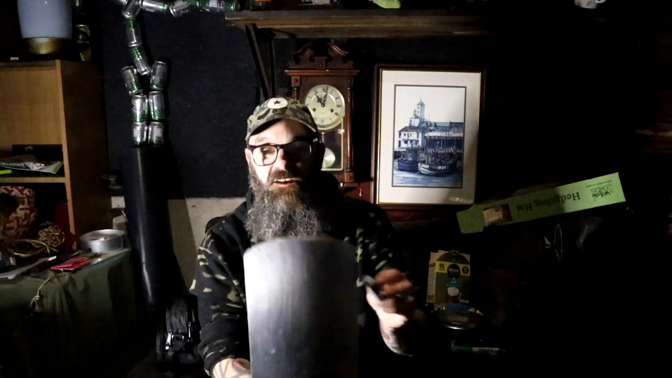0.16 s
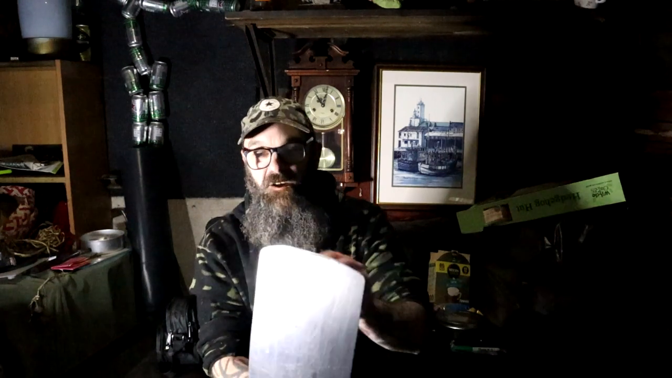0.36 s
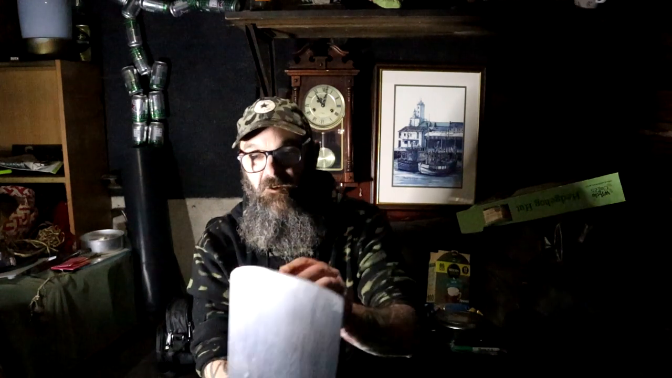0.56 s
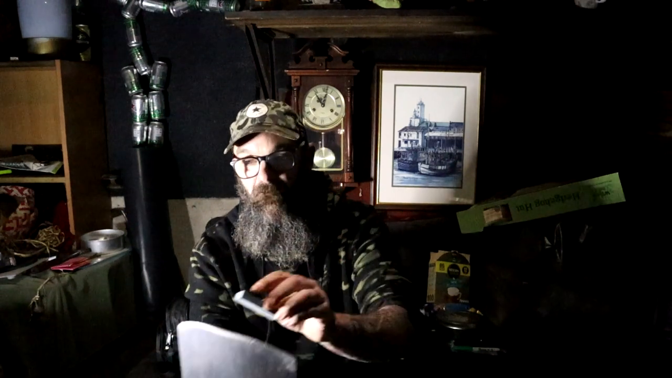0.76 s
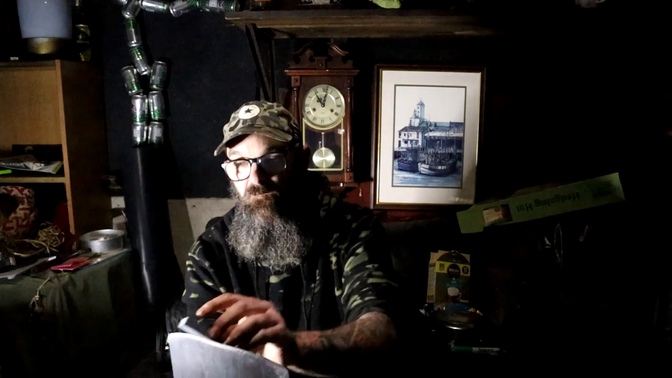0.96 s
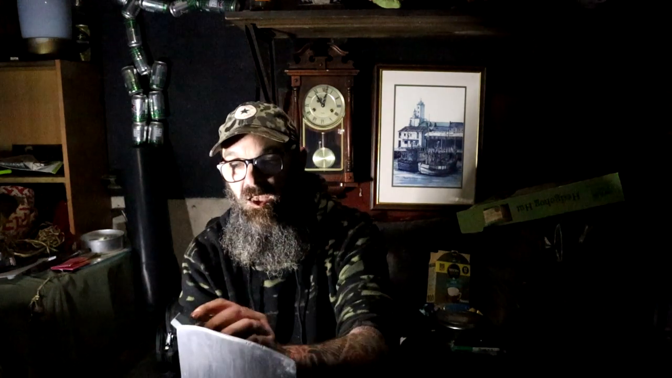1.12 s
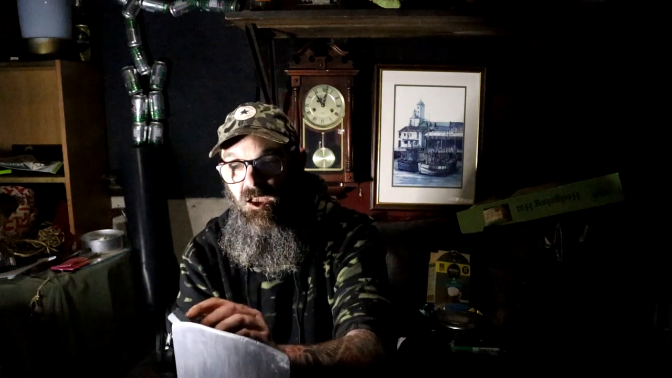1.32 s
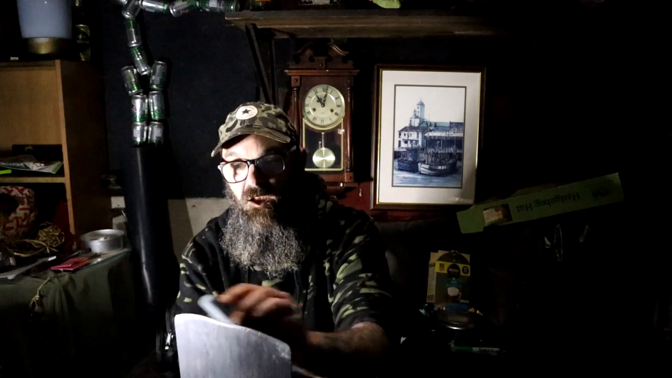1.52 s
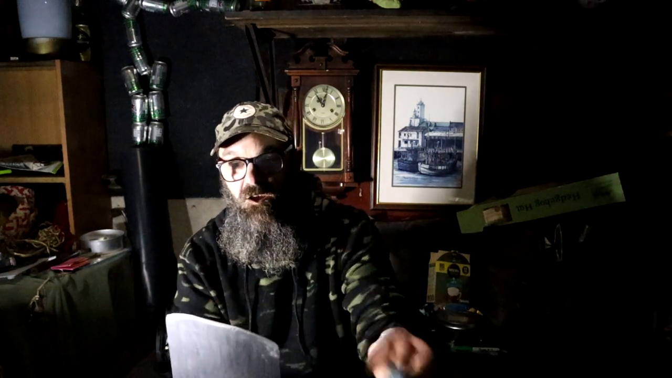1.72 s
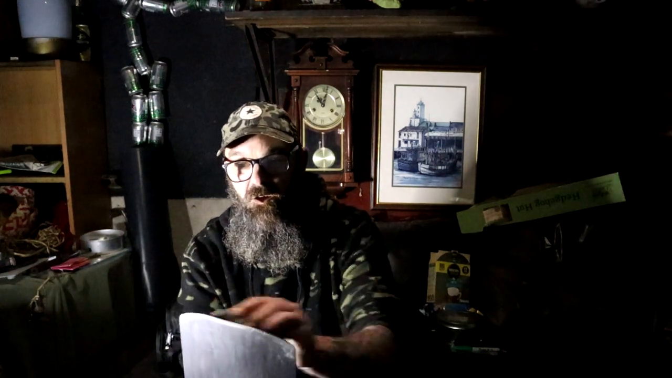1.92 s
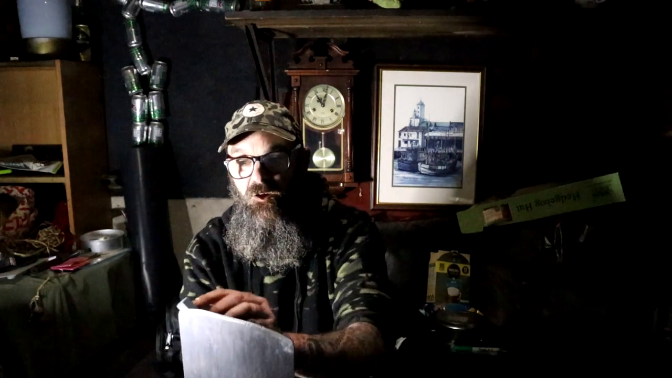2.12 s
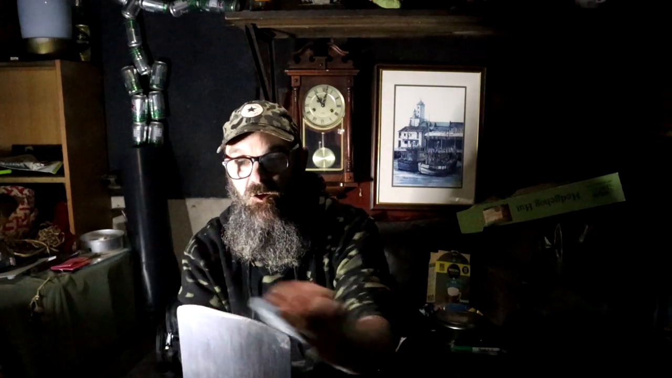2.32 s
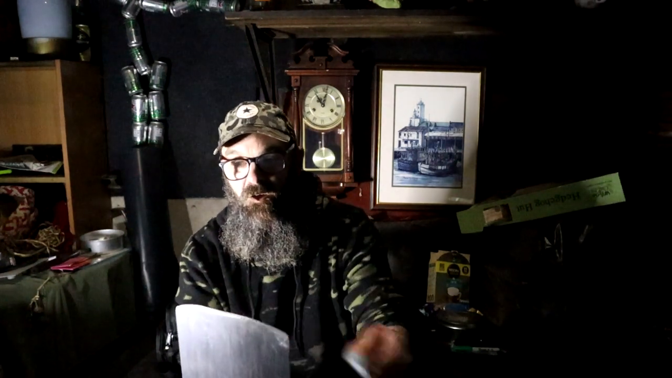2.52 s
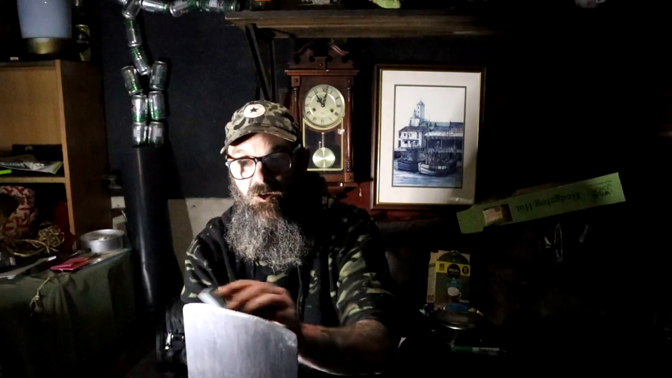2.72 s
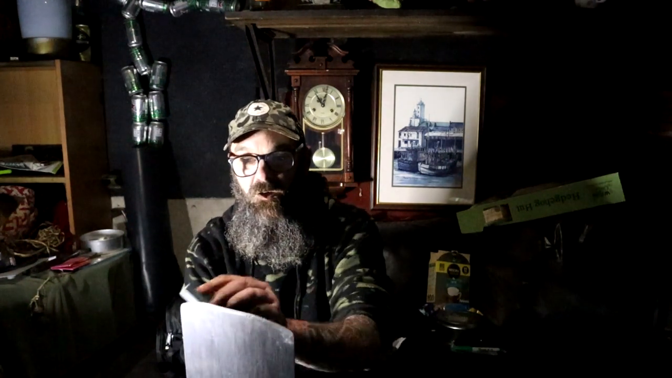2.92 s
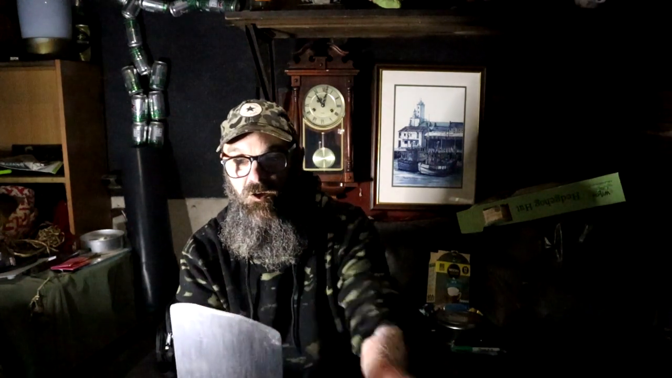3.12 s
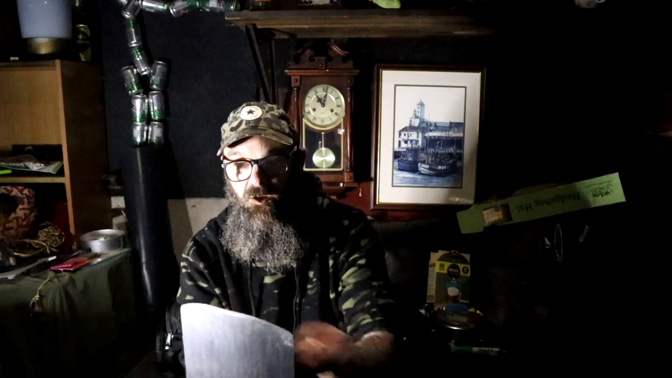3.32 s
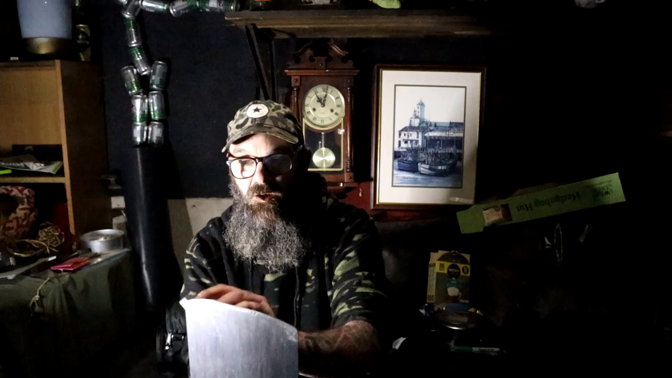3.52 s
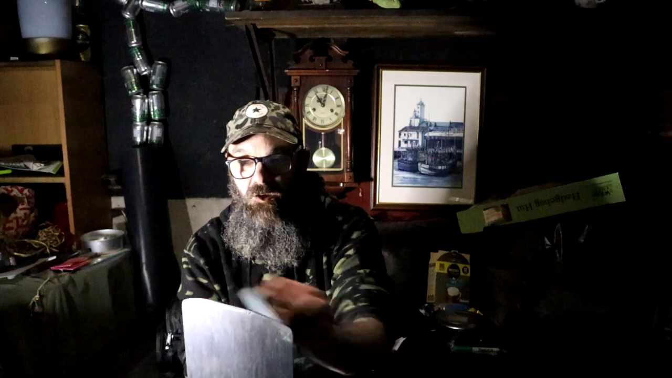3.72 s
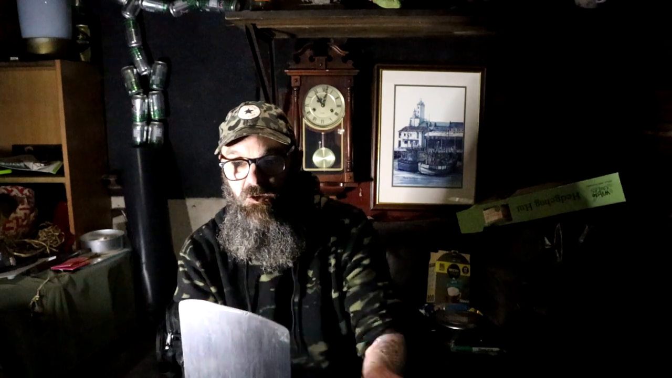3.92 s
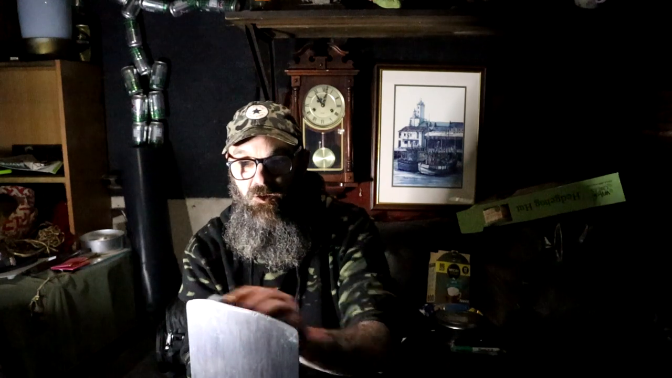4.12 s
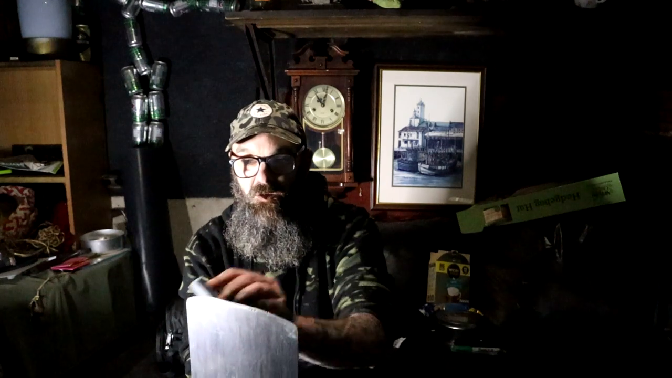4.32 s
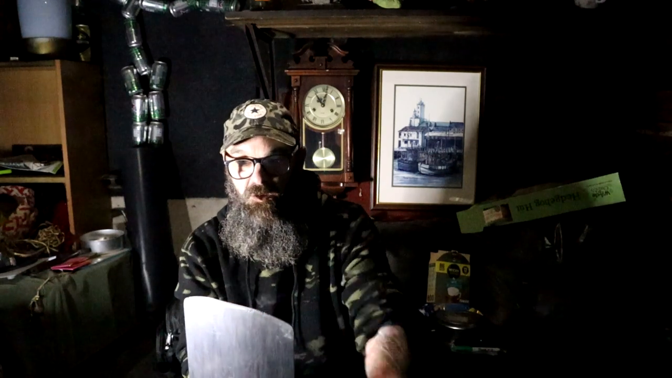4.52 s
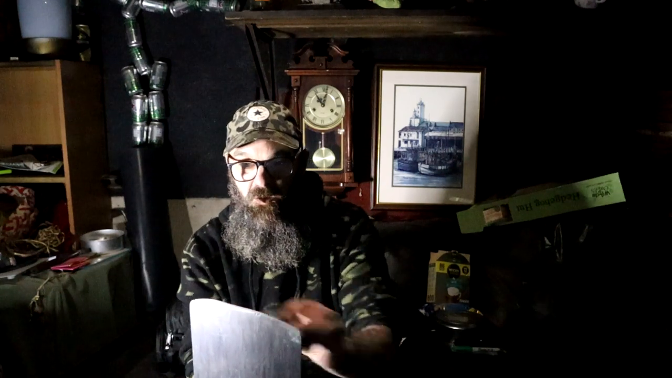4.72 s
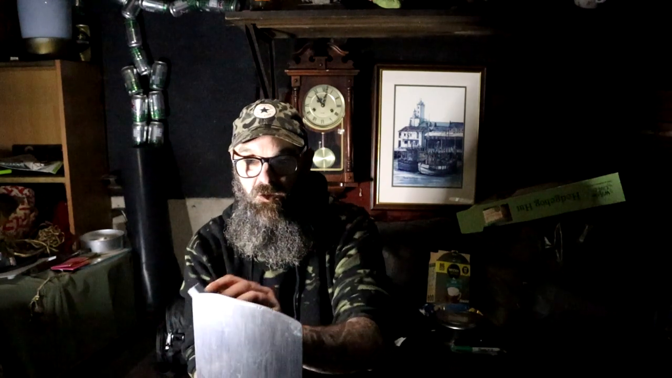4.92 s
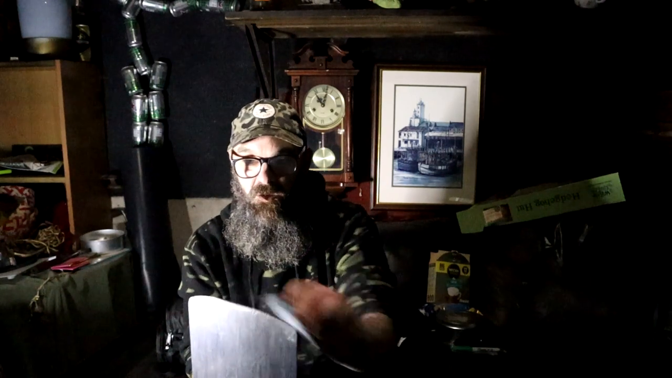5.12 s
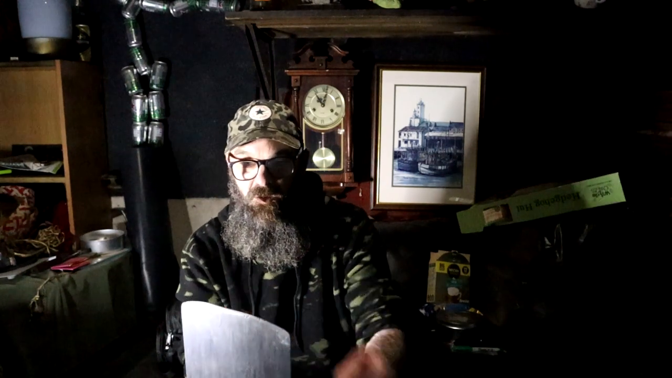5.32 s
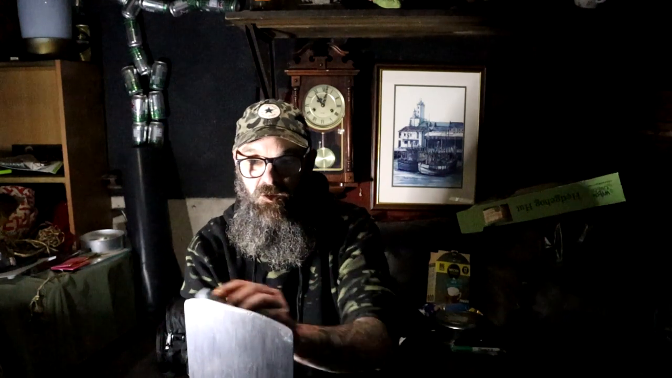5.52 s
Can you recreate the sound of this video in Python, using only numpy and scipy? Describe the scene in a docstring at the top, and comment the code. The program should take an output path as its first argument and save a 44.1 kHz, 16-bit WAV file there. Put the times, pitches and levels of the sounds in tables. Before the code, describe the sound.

In a small quiet shed, close to the microphone, sleeve and hand brush and bump a steel spade, zipping over the blade. A stone then taps and feels for the edge, followed by six gritty strokes roughly three quarters of a second apart. Each lands with a click, glides lightly, bites into a bright hard rasp and lifts off with a short metallic ring. The seat creaks faintly between strokes.

```python
"""In the faint air noise and hiss of a small shed, sleeve and hand first brush and bump a steel spade,
zip across its blade and slide off it. A sharpening stone then feels for the edge and is drawn along it
six times: each stroke lands with a tap, glides lightly, bites into a hard rasp and leaves the blade ringing.
Noise excites damped modes for stone and taps, decaying sines form the ring, and filtered slips make
the seat creak as the arm swings back."""
import sys
import numpy as np
from scipy import signal
from scipy.fft import rfft, irfft
from scipy.io import wavfile
from scipy.ndimage import uniform_filter1d, map_coordinates

SR = 44100
rng = np.random.default_rng(int(sys.argv[2]) if len(sys.argv) > 2 else 0)


def persist_wave(psi):
    """Save psi, clipped to +-1, as 16-bit WAV."""
    counts = np.round(np.clip(psi, -1, 1) * 32767).astype(np.int16)
    wavfile.write(sys.argv[1], SR, np.atleast_2d(counts).T)


N = 245017
TIME = np.arange(N) / SR


def undb(db):
    """Logarithmic level: decibels become an amplitude gain."""
    return 10 ** (np.asarray(db) / 20)


def unit(x):
    """Normalisation of power: scale to rms 1."""
    return x / np.sqrt(np.mean(x ** 2))


def noise():
    """White noise: equal mean power at every frequency."""
    return rng.standard_normal(N)


def walk(rate):
    """Slow random modulation: spread near 1, a new value rate times a second, straight lines between."""
    return 1.175 * np.interp(TIME * rate, np.arange(8000), rng.standard_normal(8000))


def colour(x, points):
    """Minimum-phase filtering: a causal response through the given (Hz, dB) points."""
    hz, db = np.transpose(points)
    size = 2048
    grid_hz = np.fft.rfftfreq(size, 1 / SR) + 1
    log_gain = np.log(undb(np.interp(np.log(grid_hz), np.log(hz), db)))
    # folding the cepstrum onto positive time makes the response causal
    cepstrum = irfft(log_gain)
    cepstrum[1:size // 2] *= 2
    cepstrum[size // 2 + 1:] = 0
    response = irfft(np.exp(rfft(cepstrum)))
    return signal.fftconvolve(x, response)[:N]


def resonate(x, hz, width):
    """Damped resonance: gain 1 at the centre, width in Hz."""
    return signal.lfilter(*signal.iirpeak(hz, hz / width, fs=SR), x)


def band(x, hz, kind):
    """Zero-phase filtering: low, high or band-pass without delay."""
    return signal.sosfiltfilt(signal.butter(4, hz, kind, fs=SR, output="sos"), x)


def burst(start, decay, rise):
    """Impulsive envelope: a quick rise and an exponential decay, both time constants in seconds."""
    age = np.maximum(TIME - start, 0)
    return (1 - np.exp(-np.minimum(age / rise, 20))) * np.exp(-np.minimum(age / decay, 20))


def bell(centre, width):
    """Gaussian swell: peaks at 1."""
    return np.exp(-.5 * ((TIME - centre) / width) ** 2)


def gate_db(start, end, attack_db_per_s, release_db_per_s):
    """Exponential onset and release: 0 dB from start to end, falling away on both sides."""
    before = np.maximum(start - TIME, 0)
    after = np.maximum(TIME - end, 0)
    return np.maximum(-attack_db_per_s * before - release_db_per_s * after, -120)


def grains(spread_db):
    """Granular excitation: dense fractures of grit whose size jumps from grain to grain."""
    return unit(noise() * undb(spread_db * walk(1400)))


# Spectrum of the still air in the shed. Each row: frequency in Hz, relative level in dB.
AIR_SPECTRUM = [(20, -1), (60, -4), (150, -8.5), (270, -4), (420, -9), (700, -8), (1150, -6), (2000, -18.5),
                (5000, -25.5), (16000, -35)]
AIR_DB = -55
HISS_DB, HISS_FADE_DB_PER_S = -63.5, 1.5  # level at the start and its fall


def air():
    """Stationary background noise: coloured air of wavering level, and a faint hiss that dies down."""
    still_air = undb(AIR_DB + 1.0 * walk(15)) * unit(colour(noise(), AIR_SPECTRUM))
    hiss = undb(HISS_DB - HISS_FADE_DB_PER_S * TIME) * noise()
    return still_air + hiss


# Modes of the blade pressed by the stone; cloth and taps use their light levels too.
# Each row: frequency in Hz, width in Hz, relative level in dB in the light glide, and in the hard rasp.
PRESSED_MODES = [(637, 34, -15.5, -15), (790, 28, -19, -13.5), (969, 42, -20.5, -5.5),
                 (1139, 7.6, -9.5, -12), (1235, 20, -10, -3), (1439, 25, -0.5, 0), (1746, 70, -14, -3.5),
                 (2190, 53, -5, -6), (2474, 40, -6, -7.5), (2730, 56, -13.5, -3), (3064, 95, 1.5, -0.5),
                 (3240, 8, -1.5, -3), (3717, 28, 4, -1.5), (3837, 30, 1.5, -5), (4097, 41, -4, 1),
                 (4417, 120, -6, -4), (4650, 120, -8, -2.5), (4896, 59, 0, -2.5), (5076, 49, -8.5, -5),
                 (5440, 30, -6.5, -5), (5940, 40, -13, -7.5), (7203, 22, -2.5, -1), (7453, 79, -8.5, -2),
                 (8010, 50, -16, 0), (8250, 42, -11, 0), (8740, 45, -9, -5.5), (9330, 140, -18.5, -7),
                 (10140, 23, -18, -2), (10830, 24, -17.5, 1), (12360, 160, -24.5, -15)]


def glide_tone(force):
    """Modal damping: light contact lets the blade sound in fixed, damped modes."""
    return unit(sum(undb(light) * resonate(force, hz, width) for hz, width, light, _ in PRESSED_MODES))


# Spectrum of the brushing. Each row: frequency in Hz, relative level in dB.
CLOTH_SPECTRUM = [(71, -42.5), (120, -9.5), (343, -7), (655, 0), (739, -13), (1280, -1.5), (1760, -8),
                  (2480, -0.5), (3360, -7), (4120, -2.5), (6290, -15), (15000, -26)]
# Sleeve and hand brush the spade.
# Each row: start in seconds, end in seconds, level in dB before brush_db, dry hiss in dB re that level.
BRUSHES = [(0.0, .032, -38, -3), (0.248, 0.364, -60, -12), (0.402, 0.525, -49.5, -9),
           (.598, .66, -45.5, -12), (0.723, 0.887, -47.5, -20), (.735, 0.793, -35, -14)]
BRUSH_ATTACK_DB_PER_S, BRUSH_RELEASE_DB_PER_S = 1198, 380
DRY_HISS_HZ, DRY_HISS_WIDTH_HZ = 8700, 1400  # width of each of two resonances in series


def brushes(brush_db=-6.0, blade_db=-5):
    """Frictional noise: fibres excite themselves and the blade, with a dry hiss above."""
    cloth = unit(colour(grains(spread_db=2.5), CLOTH_SPECTRUM)) + undb(blade_db) * glide_tone(noise())
    dry_hiss = resonate(noise(), DRY_HISS_HZ, DRY_HISS_WIDTH_HZ)
    dry_hiss = unit(resonate(dry_hiss, DRY_HISS_HZ, DRY_HISS_WIDTH_HZ))
    out = 0
    for start, end, db, hiss_db in BRUSHES:
        gate = gate_db(start, end, BRUSH_ATTACK_DB_PER_S, BRUSH_RELEASE_DB_PER_S)
        out = out + undb(brush_db + db + gate) * (cloth + undb(hiss_db) * dry_hiss)
    return out


# The spade bumps against the lap.
# Each row: start in seconds, level in dB, frequency in Hz, decay time constant in seconds.
BUMPS = [(.232, -38, 258, 0.0076), (.24, -49.5, 94, 0.066), (0.512, -47.5, 169, .03), (.79, -46, 301, .02),
         (1.025, -50, 42, .1), (1.238, -33.5, 282, 0.016), (1.245, -44.5, 120.5, 0.038)]


def bumps(rattle=0.9):
    """Impact response: each bump is a damped sine with a rattle of low-passed noise."""
    out = 0
    for start, db, hz, decay in BUMPS:
        rattling = rattle * unit(band(noise(), 3 * hz, "low"))
        thud = np.sin(2 * np.pi * hz * (TIME - start)) + rattling
        out = out + undb(db) * burst(start, decay, rise=0.002) * thud
    return out


# Ribbed cloth zips across the blade, speeding up and slowing.
# Each row: fastest moment in seconds, width of the speed swell in seconds, half length in seconds,
# ribs a second at the fastest in Hz, level in dB.
ZIPS = [(.272, .12, .035, 1270, -54), (.655, 0.08, .026, 3600, -43), (.759, .027, .031, 4190, -29.5)]
ZIP_FADE_DB = 18  # fall in level half a length from the middle


def zips(jitter=.035, overtone_db=-20, flutter_db=3.5):
    """Periodic excitation: ribs tick over the blade at a rate that follows the speed of the sleeve."""
    out = 0
    for s, swing, half, top_hz, db in ZIPS:
        rib_hz = top_hz * bell(s, swing) * (1 + jitter * walk(1200))
        phase = 2 * np.pi * np.cumsum(rib_hz) / SR
        ribs = np.sin(phase) + undb(overtone_db) * np.sin(2 * phase)
        ribs = ribs * undb(flutter_db * walk(300))
        away = ((TIME - s) / half) ** 4
        out = out + ribs * undb(db - ZIP_FADE_DB * away)
    return out


# Modes of the free blade. Each row: frequency in Hz, relative level in dB, 60 dB decay time in seconds,
# change in dB when the contact leaves at the corner.
FREE_MODES = [(625,-38.5,.33,4), (960,-40,.43,-5), (1167,-43.5,1.4,5), (1365,-35,.74,-3),
              (1445,-31.5,.35,5), (1609,-37,.41,-3), (2060,-35,.16,0), (2250,-34,.16,0),
              (2525,-25.5,.56,-1), (3052,-47,.26,-3), (3714,-22,.27,4), (3835,-30,.16,0), (4046,-22,.22,-1),
              (4620,-37.5,.11,0), (4860,-29,.08,0), (5685,-43,.15,0), (6003,-29,.14,0), (7200,-37.5,.11,0),
              (7995,-33,.1,0), (8290,-32,.13,0), (8511,-35.5,.11,0), (10165,-41,.15,0), (10863,-31,.14,0)]
# The sleeve slides off the blade. The row: time in seconds, change of the flexing modes in dB,
# low ring in dB, high ring in dB, place of leaving from -1 early to 1 at the corner.
SLEEVE_OFF = (0.788, 0, -23.5, -26, .8)
FLEX_HZ = 1100  # the blade's flexing modes lie below this


def ring(build_s=0.022, scatter_db=1.5, split_hz=3300):
    """Free vibration: modes build up as contact ends, then decay; the place of leaving weights them."""
    out = np.zeros(N)
    hz, mode_db, t60, corner_db = np.transpose(FREE_MODES)[:, :, None]
    lifts = [(s, flex_db, low_db, high_db, place)
             for _, _, _, s, *_, flex_db, _, low_db, high_db, place in STROKES]
    for s, flex_db, low_db, high_db, place in [SLEEVE_OFF] + lifts:
        span = (TIME > s - .15) & (TIME < s + 1)
        age = TIME[span] - s
        chance = rng.standard_normal((len(FREE_MODES), 2))
        strength_db = flex_db * (hz < FLEX_HZ) + np.where(hz < split_hz, low_db, high_db)
        db = mode_db + strength_db + place * corner_db + scatter_db * chance[:, 1:]
        build = np.minimum(age, 0) / build_s
        decay = np.log(1000) * np.maximum(age, 0) / t60
        tones = np.sin(2 * np.pi * (hz * age + chance[:, :1]))
        out[span] += np.sum(undb(db) * np.exp(build - decay) * tones, axis=0)
    return out


# Broad spectrum of a tap. Each row: frequency in Hz, relative level in dB.
TAP_SPECTRUM = [(88, -70), (150, -43.5), (1420, -11.5), (1790, -21), (2140, -7), (2550, -16), (3040, 4.5),
                (3420, -7.5), (3770, -10.5), (6140, -21), (6770, -31), (7320, -28), (16000, -40.5)]
# The gliding stone catches on a nick. Each row: time in seconds, level in dB.
NICKS = [(1.348, -28), (1.391, -28), (1.466, -23), (1.494, -17), (2.169, -19), (2.285, -14), (2.322, -11.5),
         (3.699, -11)]
TAP_DECAY_S, NICK_DECAY_S = .012, .005  # time constants
# Strokes of the stone, the first two only feel for the edge; taps, contact and ring all read them.
# Each row: landing, start of the push, full pressure and lift, all in seconds, then tap, glide and rasp
# in dB, change of the flexing bass in dB, hiss in dB re level, low ring and high ring in dB,
# place of leaving the edge from -1 early to 1 at the corner.
STROKES = [ (1.110, 1.21, 1.238, 1.246, -17, -29.5, -23, 0, -17, -17, -28, 0),
           (1.262, 1.285, 1.5, 1.312, -41, -56, -53, 0, -1, -40, -40, 0),
           (1.324, 1.428, 1.527, 1.686, -28, -43, -12, 1.5, -5.5, 1.5, -1.5, -1),
           (2.095, 2.266, 2.290, 2.41, -16, -29.5, -12, -2, -5, 0.5, 2.5, 1),
           (2.872, 2.951, 3.040, 3.134, -7, -30.5, -13, -2.5, -5.5, 0, 2.5, 0),
           (3.569, 3.652, 3.752, 3.831, -14, -32, -12.5, -1, -4, 0.5, 2, 0),
           (4.283, 4.328, 4.415, 4.523, -10.5, -31, -14, 2, -3, -1, -4.5, -.4),
           (4.955, 5.031, 5.113, 5.213, -11.5, -32, -13.5, 0, -4, -3.5, -1.5, .2)]


def taps(grit_db=-3):
    """Impact excitation: the stone strikes the edge, or a nick in it, and the crunch dies away at once."""
    landings = sum(undb(db) * burst(lands, TAP_DECAY_S, rise=0.00028)
                   for lands, _, _, _, db, *_ in STROKES)
    catches = sum(undb(db) * burst(s, NICK_DECAY_S, rise=0.00028) for s, db in NICKS)
    crunch = unit(colour(noise(), TAP_SPECTRUM))
    return (landings + catches) * unit(glide_tone(noise()) + undb(grit_db) * crunch)


SETTLE_DB, SETTLE_S = 6.5, 0.027  # the hand's weight presses a little harder just after landing
EASE_DB, EASE_S = 2.5, 0.016  # the pressure eases near the end of the edge
MID_EDGE_S, MID_EDGE_WIDTH_S = 0.058, .026  # the stone passes mid-edge this long before it lifts
# bass re level in glide and rasp, and its boosts
GLIDE_BASS_DB, RASP_BASS_DB, MID_EDGE_BASS_DB, LANDING_BASS_DB = -21.5, -27, 10.5, 7.5
# change of hiss under pressure, at mid-edge and as the stone eases off
RASP_HISS_DB, MID_EDGE_HISS_DB, EASE_HISS_DB = -2.5, 3.5, 3


def contact(press_db_per_s, release_db_per_s):
    """Contact force: level, bass and hiss as each stroke lands, glides, is pushed, eases and lifts."""
    strokes = []
    for lands, pushes, full, lifts, _, glide_db, rasp_db, flex_db, hiss_db, *_ in STROKES:
        push = np.clip((TIME - pushes) / max(full - pushes, 1e-3), 0, 1)
        settle = np.exp(-np.maximum(TIME - lands, 0) / SETTLE_S)
        ease = np.exp(-np.maximum(lifts - TIME, 0) / EASE_S)
        mid_edge = bell(lifts - MID_EDGE_S, MID_EDGE_WIDTH_S)
        level = glide_db + (rasp_db - glide_db) * push + SETTLE_DB * settle - EASE_DB * ease
        level = level + gate_db(lands + TAP_DECAY_S, lifts, press_db_per_s, release_db_per_s)
        bass = flex_db + GLIDE_BASS_DB + (RASP_BASS_DB - GLIDE_BASS_DB) * push
        bass = bass + MID_EDGE_BASS_DB * mid_edge + LANDING_BASS_DB * settle
        hiss = hiss_db + RASP_HISS_DB * push + MID_EDGE_HISS_DB * mid_edge + EASE_HISS_DB * ease
        strokes.append((level, bass, hiss))
    strokes = np.array(strokes)
    loudest = np.argmax(strokes[:, 0], axis=0)  # one stroke sounds at a time
    return strokes[loudest, :, np.arange(N)].T


# Broad spectrum of the grinding grit. Each row: frequency in Hz, relative level in dB.
GRIT_SPECTRUM = [(120, -72), (200, -35), (448, -35), (749, -9.5), (836, -18), (933, -15), (1300, -7),
                 (1450, -2.5), (2910, -4), (3830, 2.5), (5040, -8.5), (6400, -12.5), (7270, -6.5),
                 (11100, -13.5), (16000, -31.5)]


def plate(force, t60_s):
    """High modal density: the blade's countless weak modes merge into a short, random shimmer."""
    size = 8192
    response = rng.standard_normal(size) * undb(-60 * TIME[:size] / t60_s)
    return unit(colour(signal.fftconvolve(force, response)[:N], GRIT_SPECTRUM))


def rasp_tone(force, wander_db, wander_rate):
    """Modal coupling: the fast stone crosses nodes and crests, so each mode swells on its own."""
    return unit(sum(undb(hard + wander_db * walk(wander_rate)) * resonate(force, hz, width)
                    for hz, width, _, hard in PRESSED_MODES))


def rim_echo(x, lag_s, sway, gain):
    """Comb interference: bending waves return from the rim with a delay that shifts as the stone travels."""
    lag = lag_s * np.exp(sway * walk(11))
    return x + gain * map_coordinates(x, [np.arange(N) - lag * SR], order=3)


def steady(x, span_s):
    """Short-time power normalisation: even power over each span, the finer grain kept."""
    power = np.abs(uniform_filter1d(x ** 2, int(span_s * SR)))
    return x / np.sqrt(power + 1e-12)


def stone(bite_db=-20, bite_range_db=3, glide_grit_db=-12, rasp_grit_db=-6,
          chatter_db=2.5, rasp_chatter_db=1.05):
    """Abrasive friction: a chattering glide gives way to a broad rasp as the pressure grows."""
    db, bass_db, hiss_db = contact(press_db_per_s=5000, release_db_per_s=1150)
    bite = 1 / (1 + np.exp((bite_db - db) / bite_range_db))
    glide = glide_tone(grains(spread_db=3.5))
    glide = glide + undb(glide_grit_db) * plate(grains(spread_db=2.5), t60_s=0.074)
    rasp = rasp_tone(grains(spread_db=4.0), wander_db=5.0, wander_rate=35)
    rasp = rasp + undb(rasp_grit_db) * plate(grains(spread_db=2.0), t60_s=0.091)
    rasp = rim_echo(rasp, lag_s=0.000791, sway=.4, gain=.35)
    out = 0
    for tone, share, rough_db in (glide, 1 - bite, chatter_db), (rasp, bite, rasp_chatter_db):
        # the blade flexes most with the stone at mid-edge, and is too small to radiate deep bass
        tone = band(tone, 480, "high")
        bass, treble = band(tone, 1127, "low"), band(tone, 6510, "high")
        middle = tone - bass - treble
        treble = treble - 0.45 * band(treble, 11500, "high")
        parts = (bass, bass_db - .6), (middle, -.3), (treble, hiss_db + 0.22)
        mix = sum(undb(part_db) * steady(part, span_s=0.019) for part, part_db in parts)
        chatter = unit(undb(rough_db * walk(170)))
        out = out + np.sqrt(share) * chatter * mix
    return out * undb(db)


# The seat creaks in runs of slips that grow stronger.
# Each row: first slip in seconds, last slip in seconds, slips a second, final level in dB.
CREAKS = [(1.903, 1.936, 90, -32), (2.630, 2.702, 56, -30), (3.371, 3.427, 71, -33),
          (4.034, 4.130, 64, -32.5), (4.696, 4.797, 105, -35), (5.34, 5.388, 80, -41.5),
          (5.444, 5.493, 110, -34.5)]
CREAK_GROW_DB_PER_S, SLIP_JITTER_S, SLIP_SCATTER_DB = 91, .0008, 1.2
# Lone slips as the seat comes to rest. Each row: time in seconds, level in dB.
LATE_SLIPS = [(1.948, -29.5), (1.964, -30.5), (2.000, -32.5), (2.026, -31.5), (2.737, -31), (2.833, -41),
              (3.470, -34.5), (3.540, -40.5), (4.242, -41.5), (4.816, -37.5)]


def slips():
    """Stick-slip timing: (s, dB) of every slip, nearly even runs and then the lone ones."""
    runs = []
    for first, last, rate, db in CREAKS:
        s = np.linspace(first, last, 1 + round((last - first) * rate))
        time_chance, level_chance = rng.standard_normal(size=(64, 2))[:len(s)].T
        levels = db - CREAK_GROW_DB_PER_S * (last - s) + SLIP_SCATTER_DB * level_chance
        runs += zip(s + SLIP_JITTER_S * time_chance, levels)
    return runs + LATE_SLIPS


# Spectrum of a slip. Each row: frequency in Hz, relative level in dB.
SLIP_SPECTRUM = [(88, -23), (150, -19.5), (545, 2.5), (954, -12), (1430, 0), (1800, -12), (2920, 4),
                 (3540, -5.5), (4120, 0.5), (5720, -12.5), (6430, -29.5), (7790, -11.5), (10000, -20.5),
                 (15000, -32)]
# Resonances of the seat, added to its knocks.
# Each row: frequency in Hz, width in Hz, level in dB re the knocks.
SEAT_MODES = [(284, 22, 9.5), (576, 130, 0), (3050, 75, -5), (4920, 180, -2), (5600, 100, 5)]


def creak(decay_s=0.004, tail_db=-21, tail_s=0.016, vary=0.5, seat_db=-1):
    """Stick-slip friction: every slip knocks the same resonant frame, a little differently."""
    size = 4096
    shape = burst(0, decay_s, rise=0.00046) + undb(tail_db) * burst(0, tail_s, rise=0.0032)
    shape = shape[:size]
    frame, force = rng.standard_normal(size), np.zeros(N + size)
    for s, db in slips():
        start = int(s * SR)
        force[start:start + size] += undb(db) * shape * (frame + vary * rng.standard_normal(size))
    filter_gain = np.std(colour(noise(), SLIP_SPECTRUM))
    knocks = undb(seat_db) * colour(force[:N], SLIP_SPECTRUM) / filter_gain
    return knocks + sum(undb(db) * resonate(knocks, hz, width) for hz, width, db in SEAT_MODES)


def shed(x, t60_s=.13, wet_db=-21):
    """Reverberation: short, dull reflections from a small cluttered room."""
    tail = band(noise(), 5600, "low") * burst(0.0024, t60_s / np.log(1000), rise=0.0023)
    return x + undb(wet_db) * signal.fftconvolve(x, tail / np.linalg.norm(tail))[:N]


def scene():
    """Superposition: handling, blade, stone and seat reverberate in the shed over faint room noise."""
    handling = brushes() + bumps() + zips()
    sources = handling + ring() + taps() + stone() + creak()
    return (shed(sources) + air())[None]


TOP_HZ = 15900


def record(dry):
    """Soft saturation and band limiting: the recorder rounds the highest peaks and cuts the top."""
    ceiling = .95
    rounded = dry / (1 + (dry / ceiling) ** 6) ** (1 / 6)
    return signal.sosfilt(signal.ellip(10, .2, 70, TOP_HZ, fs=SR, output="sos"), rounded)


dry = scene()
out = record(dry)
persist_wave(out)
```